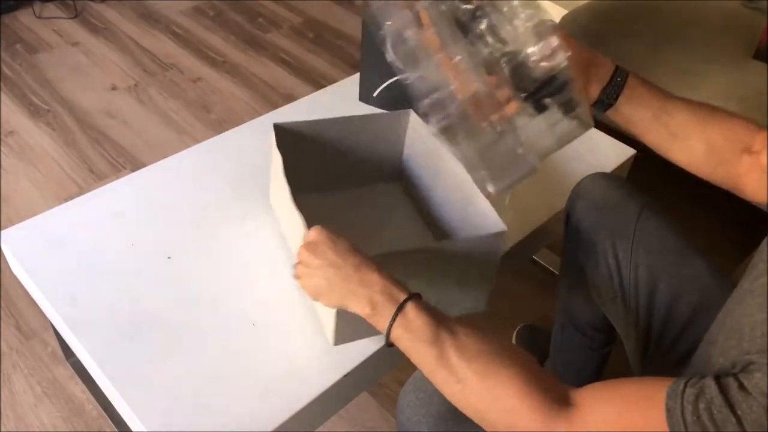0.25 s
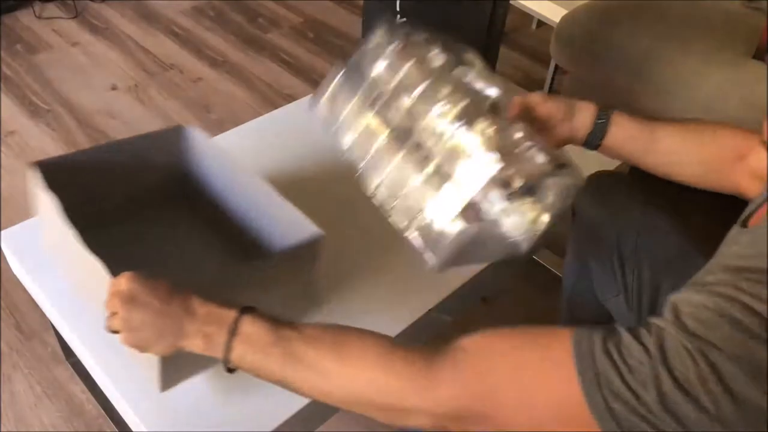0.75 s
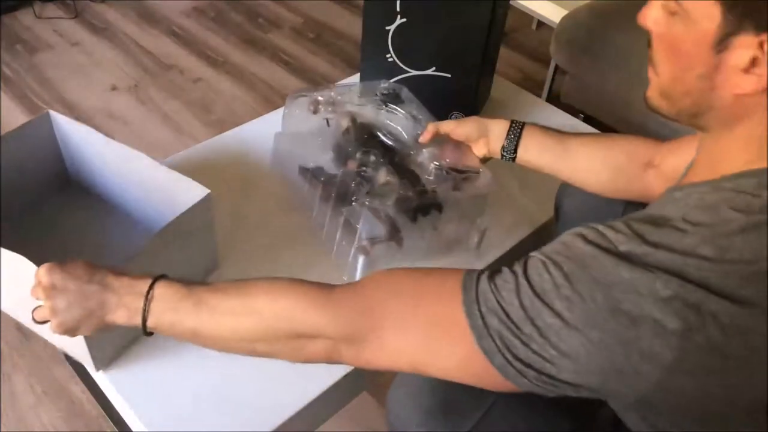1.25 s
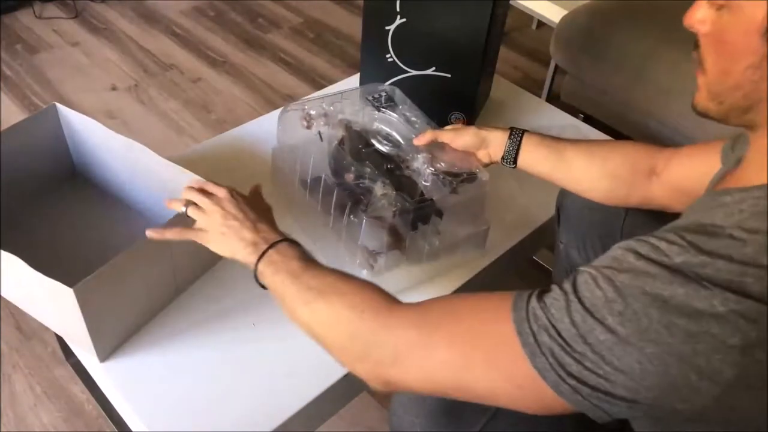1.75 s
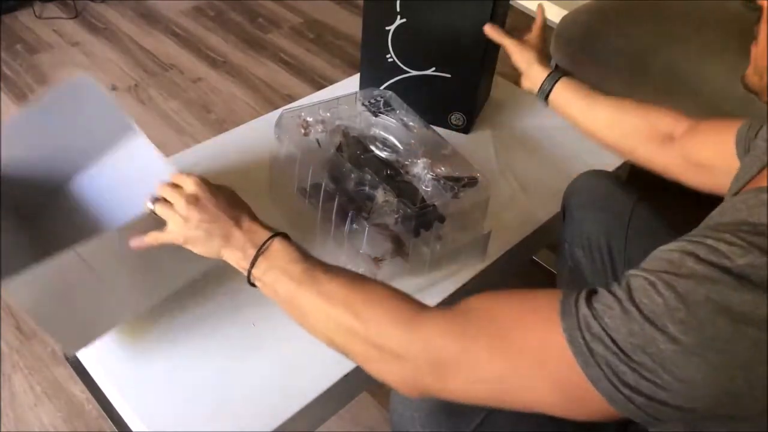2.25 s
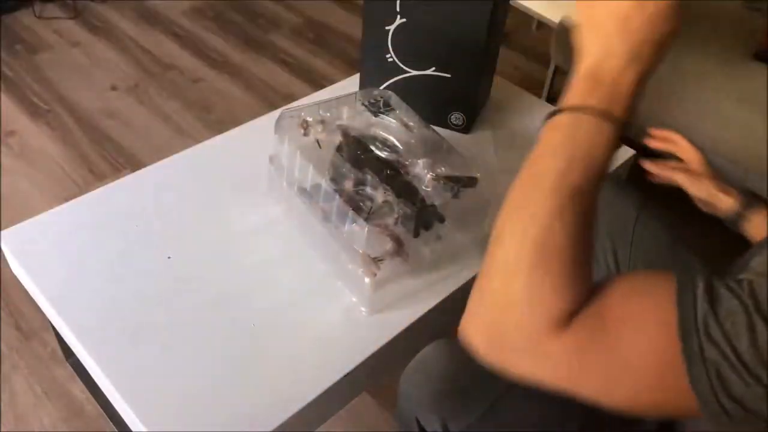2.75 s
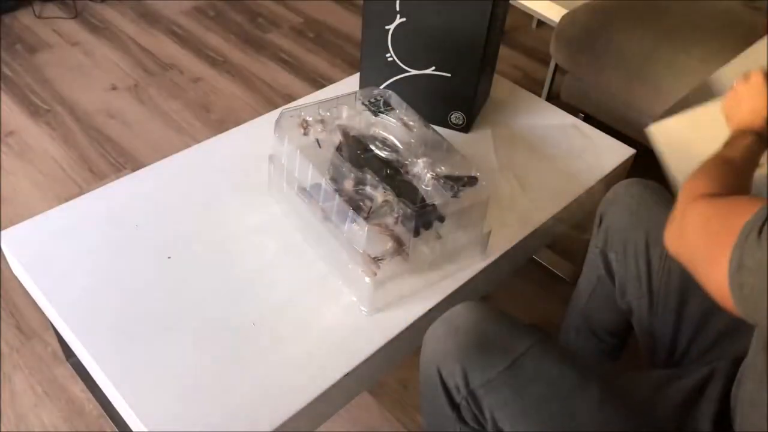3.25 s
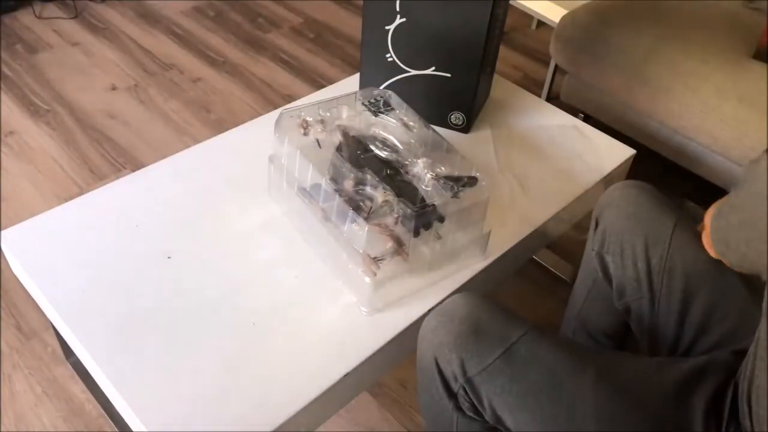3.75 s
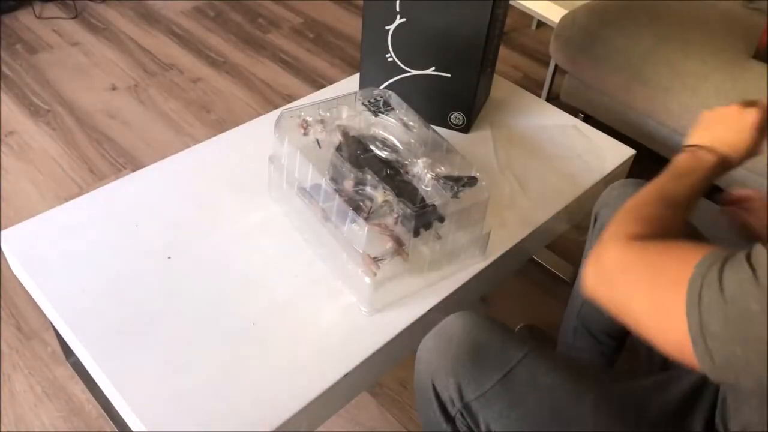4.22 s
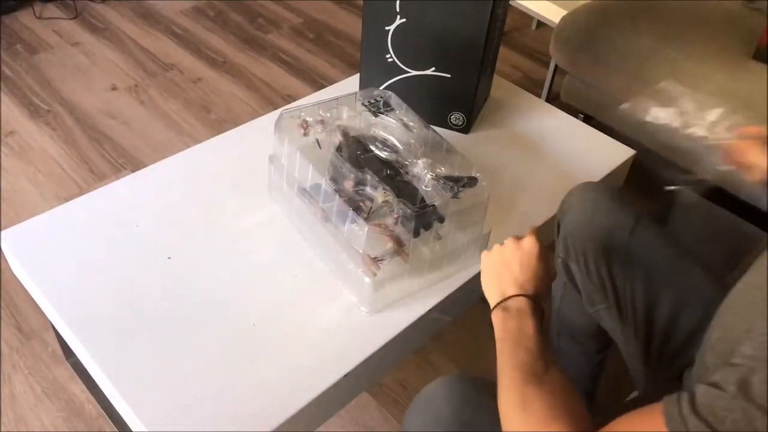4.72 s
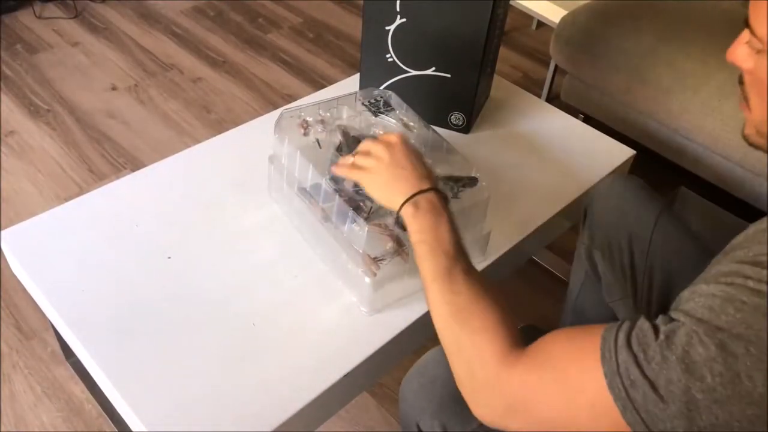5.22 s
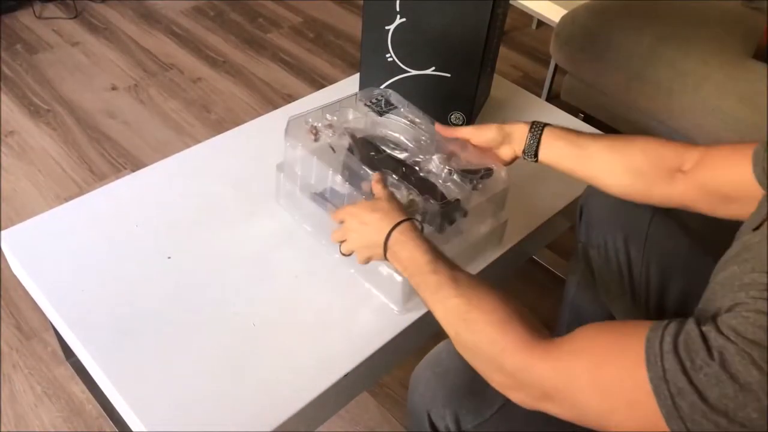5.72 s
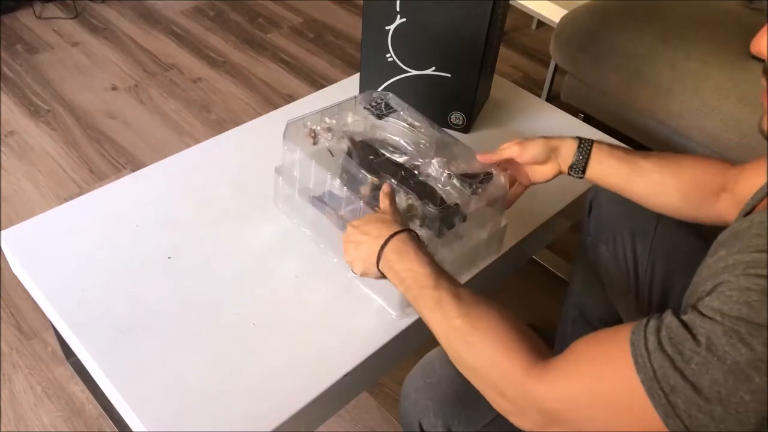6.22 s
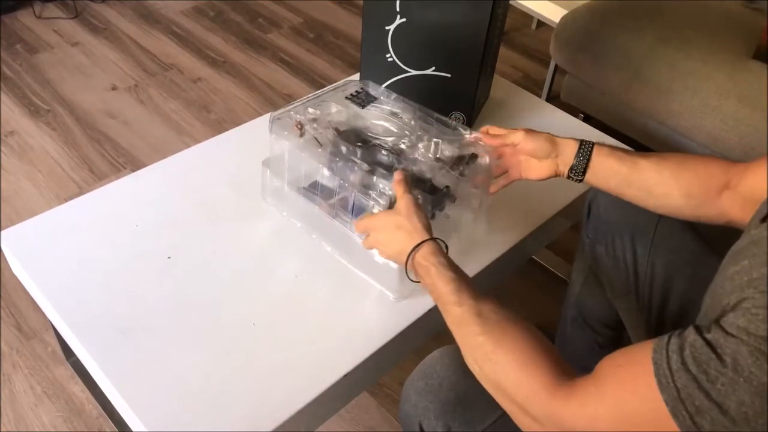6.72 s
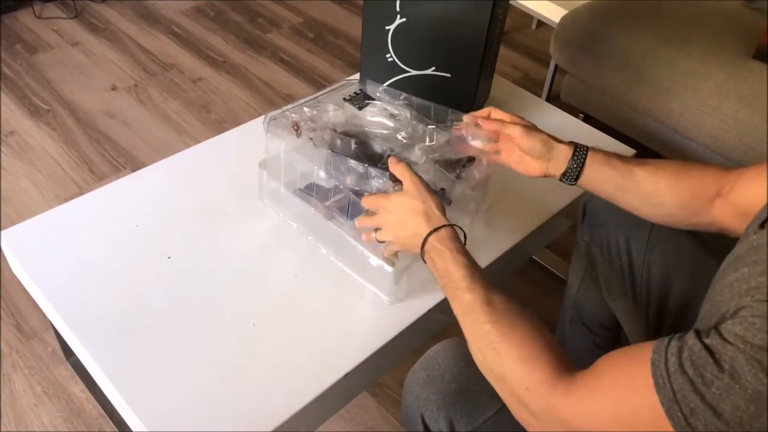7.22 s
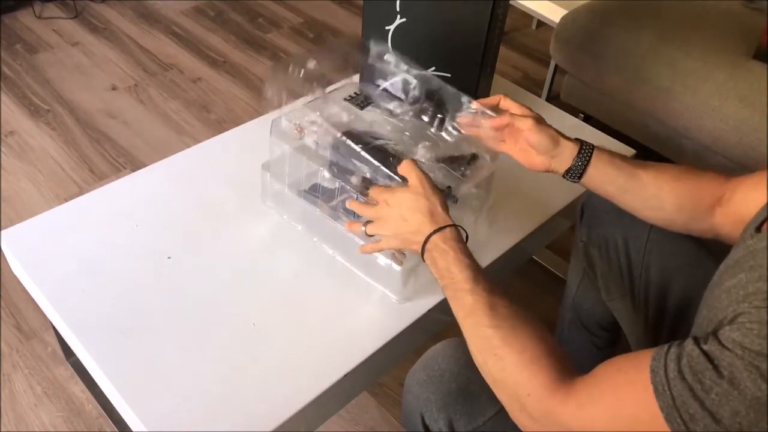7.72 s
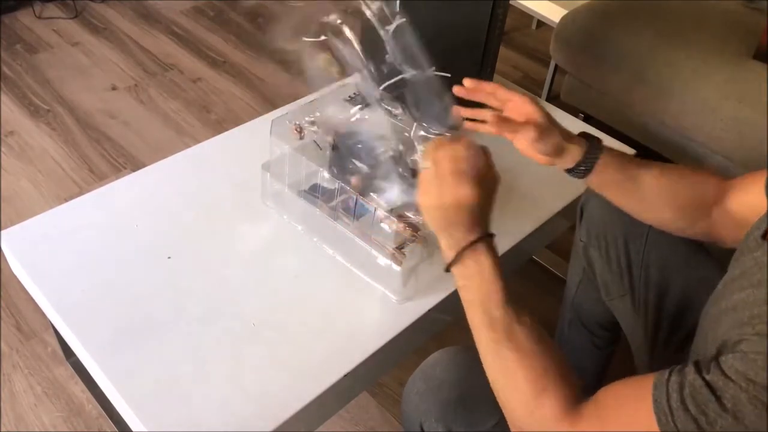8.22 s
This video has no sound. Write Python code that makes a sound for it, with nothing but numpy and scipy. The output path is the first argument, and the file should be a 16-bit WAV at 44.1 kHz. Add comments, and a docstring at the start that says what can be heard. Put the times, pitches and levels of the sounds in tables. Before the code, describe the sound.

Close indoor unboxing: an empty carton bumps a table and lands on the floor, a plastic bag crinkles, and a clear tray's lid pops open.

```python
"""Close microphone indoors: an earlier knock is still dying away, a cardboard box knocks and scrapes on a table,
then meets the floor. A plastic bag rustles, then a thin plastic tray is gripped and creaks, its lid's catches let
go and it snaps loudly near the end. Blows are bursts of noise ringing a body, hands are grainy noise, and short
dry clicks stand among them. A hard-floored room answers with a diffuse tail, over steady air and a faint hum."""
import sys
import numpy as np
from scipy import signal
from scipy.fft import rfft, irfft, next_fast_len
from scipy.io import wavfile
from scipy.ndimage import uniform_filter1d, map_coordinates

SR = 44100
rng = np.random.default_rng(int(sys.argv[2]) if len(sys.argv) > 2 else 0)


def inscribe(sig):
    """Save sig as 16-bit PCM at rate SR to the path in sys.argv[1].

    A 1-D sig is mono; a 2-D sig holds one channel per row.
    Samples are clipped to [-1, 1] before scaling.
    """
    pcm = np.round(np.clip(np.atleast_2d(sig).T, -1, 1) * 32767)
    wavfile.write(sys.argv[1], SR, pcm.astype(np.int16))


def gain_from_db(level_db):
    """Turn a decibel level (scalar or array-like) into a linear amplitude factor."""
    decades = np.asarray(level_db, float) / 20
    return 10 ** decades


N = 373527


def unit(x):
    """Scaled to rms 1."""
    return x / np.sqrt(np.mean(x ** 2) + 1e-20)


def along(points, hz):
    """Value at each frequency between (frequency, value) points, on a log axis."""
    f, v = np.transpose(points)
    return np.interp(np.log(hz + 1), np.log(f + 1), v)


def filtered(x, response):
    """x shaped by a complex response of frequency."""
    m = next_fast_len(N + SR // 2)
    return irfft(rfft(x, m) * response(np.fft.rfftfreq(m, 1 / SR)), m)[..., :N]


def body(modes, plain_db, dull_hz=1e6, edge_hz=1e6):
    """Causal sum of resonances over a plain path that fades above dull_hz and again above edge_hz."""
    def response(f):
        total = gain_from_db(plain_db) / (1 + 1j * f / dull_hz) / (1 + 1j * f / edge_hz)
        for centre, width, db in modes:
            total = total + gain_from_db(db) * 1j * f * width / (centre * centre - f * f + 1j * f * width)
        return total
    return response


def wobble(rate):
    """A smooth random curve, rate knots a second."""
    return map_coordinates(rng.standard_normal(int(N * rate / SR) + 4), [np.arange(N) * rate / SR])


def grainy(per_second, spread_db, noise_share):
    """Sparse slips of unequal size on a bed of noise."""
    size_db = spread_db * np.minimum(rng.exponential(size=N), 2.5)
    slips = (rng.random(N) < per_second / SR) * gain_from_db(size_db) * rng.choice([-1, 1], N)
    return unit(slips) + noise_share * rng.standard_normal(N)


def patchy(x, depth_db):
    """Folds give way in short, wide bursts; narrower patches of pitch stand out more weakly."""
    z = signal.stft(x, nperseg=256)[2]

    def smooth(hz_size, time_size):
        over_hz = uniform_filter1d(rng.standard_normal(z.shape), size=hz_size, axis=0)
        return unit(uniform_filter1d(over_hz, size=time_size, axis=1))

    field = smooth(hz_size=60, time_size=5) + .4 * smooth(hz_size=4, time_size=8)
    return unit(signal.istft(z * gain_from_db(depth_db * field), nperseg=256)[1][:N])


def blows(contacts, ringing, band_db):
    """Each contact is a swelling, dying chatter in four pitch ranges; returns near sound and what the walls get."""
    # limits of the bass, knock, click and tick ranges: (frequency [Hz])
    range_limits = [60, 400, 1500, 5000, 16500]
    tick_grows = 1.31  # the top range follows the bite more steeply than the click
    t = np.arange(SR // 8) / SR
    near, far = np.zeros((2, 4, N + len(t)))
    for s, knock_db, heft_db, bite_db, ms in contacts:
        # the treble of a contact ends first
        life = np.clip(ms, .2, 60) / 1000 * np.array([[1.8], [1.4], [.8], [.5]])
        tilt_db = np.array([heft_db, 0, bite_db, tick_grows * bite_db])
        gain = gain_from_db(knock_db + tilt_db + band_db)[:, None]
        swell = 1 - np.exp(-t / (0.089 * life))
        chatter = gain * rng.standard_normal((4, len(t))) * np.exp(-t / life) * swell
        at = max(round(s * SR), 0)
        near[:, at:at + len(t)] += chatter
        far[:, at:at + len(t)] += 0.41 * chatter
        # averaged over all directions, an even click
        far[:, at + SR // 300] += (gain * np.sqrt(life * SR / 2))[:, 0]
    out = np.zeros((2, N))
    centres = np.sqrt(np.multiply(range_limits[1:], range_limits[:-1]))
    for k, (lo, hi) in enumerate(zip(range_limits, range_limits[1:])):
        spread = np.sqrt(SR / 2 / (hi - lo))  # evens out the power of wide and narrow ranges
        band = signal.butter(2, [lo, hi], "band", fs=SR, output="sos")
        share = np.transpose([centres, np.eye(4)[k]])
        out[0] += spread * signal.sosfilt(band, near[k, :N])
        out[1] += spread * filtered(far[k, :N], lambda f: along(share, f))
    return filtered(out, ringing)


def box_on_table():
    """Contacts with the table ring the low, broad modes of a cardboard box."""
    # the box meets the table: (time [s], knock [dB], heft = bass over knock [dB],
    # bite = click over knock [dB], contact [ms])
    knocks = [(0.128, -10.5, -11.5, -6.5, 5.4), (0.209, -23.5, -7.5, -20, 6.4),
              (0.734, -52.5, 9, -6.5, 6.7), (1.173, -47.5, -1, -0.5, 6.8), (1.21, -46.5, -1.5, -8, 9.8),
              (1.459, -42.5, -2, -7.5, 9.5), (1.476, -33, -8, -7.5, 5.6), (1.812, -41, -21, 2, 8.5),
              (2.133, -50, 5.5, -8, 5.5), (2.156, -37, -26, -9, 4.3), (2.438, -48.5, 2, -44, 6),
              (2.456, -28.5, -7, -18.5, 4.7), (3.025, -54.5, -4, -1.5, 5.4), (3.194, -42.5, -13, -8.5, 6.6)]
    # resonances of the box: (frequency [Hz], width [Hz], level [dB])
    cardboard = [(134, 15, 11), (196, 26, 2), (272, 100, 6.5), (395, 190, -1.5), (686, 60, -10),
                 (990, 25, -6), (1200, 130, -18.5)]
    # band_db is (bass, knock, click, tick) for a blow without heft or bite, here and below
    return blows(knocks, body(cardboard, -8.0, dull_hz=3000, edge_hz=3600), band_db=(1, -0.5, 10.5, 16))


def box_on_floor():
    """Contacts with the floor ring deeper modes, with a weaker plain path."""
    # the box meets the floor: (time [s], knock [dB], heft [dB], bite [dB], contact [ms])
    landings = [(3.433, -31.5, -5.5, -26, 4.6), (3.507, -34.5, -6.5, -2, 5),
                (3.561, -32.5, -3.5, -12.5, 5.2), (3.822, -33, -2, -19, 6), (3.916, -18, -17, -25, 5.7),
                (4.111, -13, -22, -17.5, 7.2)]
    # resonances of the floor: (frequency [Hz], width [Hz], level [dB])
    floor = [(71, 19, 0.5), (150, 22, 2.5), (204, 60, 0.5), (299, 89, -5), (437, 173, -5),
             (713, 137, -12.5), (900, 90, -21)]
    return blows(landings, body(floor, -17.0, dull_hz=6190, edge_hz=36000), band_db=(3.1, -1.5, 11.5, 13.5))


def tray_snaps():
    """Snaps of thin plastic ring the shell of the tray."""
    # plastic snaps: (time [s], knock [dB], heft [dB], bite [dB], contact [ms])
    snaps = [(4.552, -49.5, -20, -11, 5.8), (4.632, -49, -18, 4, 5.4), (5.409, -53.5, -14, -9.5, 5.2),
             (5.478, -35, 0, -8, 6.1), (5.574, -39, 1, -1, 7.1), (5.797, -45, 5, 2, 5.8),
             (5.977, -37.5, -1, 2.5, 5), (6, -38, -14, -3.5, 6.8), (6.033, -33.5, -4, -2.5, 5.2),
             (6.108, -37.5, -6, -4, 6.2), (6.394, -47, -11, -24, 5.2), (6.646, -45, -21, -12.5, 3.6),
             (6.739, -45, 12, -14, 5.2), (6.861, -38.5, -4, -12.5, 4.5), (7.086, -35.5, -28, -4.5, 4.3),
             (7.89, -48, -19, -13, 4.8), (8.041, -49.5, -4, -10, 5.3), (8.167, -42.5, -11, -7.5, 6.7),
             (8.196, -42, -8, -8, 5.7), (8.316, -35, -9, -4, 16), (8.323, -23, -13.5, -6, 7.5),
             (8.335, -13.5, -18.5, -15.5, 10.3), (8.349, -11, -19, -28, 5.2), (8.454, -19.5, -17, -5.5, 6)]
    # resonances of the tray: (frequency [Hz], width [Hz], level [dB])
    plastic = [(231, 15, 5.5), (282.6, 27, 10.5), (400, 100, -43), (562, 65, -1), (1000, 340, -14.5),
               (1370, 270, -18.5), (1814, 48, -23.5), (3150, 390, -14)]
    return blows(snaps, body(plastic, -9.0, dull_hz=11100, edge_hz=16000), band_db=(-0.5, 0.5, 7, 11.5))


def lid_catches():
    """The catches let go and ring the lid, whose modes reach far into the treble."""
    # the lid's catches let go: (time [s], knock [dB], heft [dB], bite [dB], contact [ms])
    releases = [(7.369, -22, -20, -3, 2.7), (7.414, -18, -12.5, 2, 5)]
    # resonances of the lid: (frequency [Hz], width [Hz], level [dB])
    lid_modes = [(273, 44, 7), (977, 88, -2), (1440, 170, 2.5), (1790, 120, 2), (3720, 690, -4.5),
                 (4770, 460, -3), (5920, 700, -5.5), (7660, 1600, -3)]
    return blows(releases, body(lid_modes, -4.5, dull_hz=12000, edge_hz=20000), band_db=(2.5, -0.5, 5.5, 4))


def handling():
    """Pressure drums on the table, slip rustles thin plastic, both scrape the walls; the table hums under dragging."""
    # an earlier knock is still dying away: (time [s], pressure [dB], slip [dB])
    dying_knock = [(0.0, -33, -40), (0.11, -49, -61.5)]
    # hands at work, one table a stroke: (time [s], pressure [dB], slip [dB])
    on_box = [(0.72, -67.5, -70.5), (0.79, -84, -58), (0.9, -63, -66), (1.23, -62.5, -62.5),
              (1.41, -54, -55), (1.57, -65.5, -71.5), (1.79, -55, -68.5), (1.85, -52.5, -65.5),
              (1.98, -58, -56), (2.08, -52, -57.5), (2.18, -69, -63.5), (2.31, -60, -65.5),
              (2.47, -67.5, -95), (2.65, -63, -80), (2.74, -67, -95), (2.97, -66.5, -83),
              (3.11, -64, -80.5), (3.4, -73, -78)]
    on_floor = [(3.95, -40, -59), (4.056, -63, -59), (4.17, -38.5, -54.5), (4.3, -64, -65.5)]
    on_bag = [(4.5, -74, -77.5), (4.64, -60, -63), (4.792, -67, -58.5), (5.058, -65, -62),
              (5.12, -75.5, -56), (5.272, -75, -70), (5.42, -69, -101)]
    on_tray = [(5.5, -70, -63), (5.54, -71, -64), (5.638, -56, -53.5), (5.694, -59.5, -50.5),
               (5.87, -50.5, -59), (6.02, -62, -85), (6.092, -40, -56), (6.246, -53.5, -77.5),
               (6.484, -56.5, -57.5), (6.628, -50, -54), (6.726, -55, -59), (6.972, -49, -69),
               (7.288, -42, -55.5), (7.35, -85, -61)]
    on_lid = [(7.75, -73.5, -70), (7.934, -70, -79), (8.056, -55, -83), (8.152, -68.5, -76.5),
              (8.3, -65, -69)]
    # short low hums of the table under dragging: (middle [s], length [s], level before the grip [dB])
    drags = [(1.034, 0.092, -63), (1.312, 0.11, -47.5), (1.91, 0.091, -54.5), (2.2, 0.28, -63),
             (2.405, .1, -66), (6.103, 0.11, -57.5), (7.28, 0.21, -72.5)]
    # resonances of the table: (frequency [Hz], width [Hz], level [dB])
    table_modes = [(208, 120, -2.5), (272, 146, -0.5), (406, 270, -9.5)]
    # spectra of scraping and rustling: (frequency [Hz], relative level [dB])
    scrape_tone = [(250, -20), (500, -1), (1000, -1.5), (2000, -5.5), (3300, -5.5), (6000, -61.5),
                   (10000, -54)]
    rustle_tone = [(1200, -70), (2500, -13), (5000, -6), (8000, -9.5), (12000, -20), (16000, -18)]
    # each material: (drumming over pressure, scraping over the blend, rustling over slip), dB
    card, film, shell = (-3, -1.2, -1), (-5, -0.74, -0.77), (-5, -2.5, -5.5)
    pressure_share = 0.51  # of pressure in scraping, the rest is slip
    strokes = [(dying_knock, card), (on_box, card), (on_floor, card),
               (on_bag, film), (on_tray, shell), (on_lid, shell)]

    t, gains = np.arange(N) / SR, np.zeros((4, N))
    for stroke, material_db in strokes:
        s, pressure_db, slip_db = np.transpose(stroke)
        fade = np.clip(np.minimum(t - s[0], s[-1] - t) / .03 + 1, 0, 1)  # 30 ms outside the stroke
        blend_db = pressure_share * pressure_db + (1 - pressure_share) * slip_db
        curves = zip([pressure_db, blend_db, slip_db], material_db)
        gains[:3] += fade * gain_from_db([np.interp(t, s, curve + db) for curve, db in curves])
    gains[3] = sum(gain_from_db(db) * np.exp(-(2 * (t - s) / length) ** 2) for s, length, db in drags)

    grip = gain_from_db(1.5 * wobble(25))  # an uneven grip shakes the layers together
    drum = unit(filtered(grainy(120, 7, 0.8), lambda f: body(table_modes, -60)(f) ** 2))
    scrape = patchy(filtered(grainy(300, 1.25, 0.93), lambda f: gain_from_db(along(scrape_tone, f))), depth_db=6.0)
    rustle = patchy(filtered(grainy(200, 5.1, 0.97), lambda f: gain_from_db(along(rustle_tone, f))), depth_db=3.5)
    table_hum = unit(filtered(grainy(100, 3, 0.21), lambda f: body([(115, 22, 0)], -60)(f) ** 2))
    return grip * np.sum(gains * [drum, scrape, rustle, table_hum], axis=0)


def ping():
    """A small hard part is scuffed once: a short rough scrape rings a few hard resonances."""
    # the scuff: (time [s], level before its rise and fall [dB])
    scuffs = [(2.217, -25.5)]
    # resonances of the part: (frequency [Hz], width [Hz], level [dB])
    hard_modes = [(1050, 250, -5), (1600, 200, -4), (2095, 80, 3), (2350, 500, -4), (3150, 250, -5)]
    rise_s, fall_s = 0.013, 0.02
    t, push = np.arange(N) / SR, np.zeros(N)
    for s, db in scuffs:
        since = np.maximum(t - s, 0)
        push += gain_from_db(db) * (1 - np.exp(-since / rise_s)) * np.exp(-since / fall_s)
    return filtered(push * grainy(900, 3, 1.0), body(hard_modes, -35))


def crackles():
    """Dry clicks of under a millisecond with a short fizz, like creases popping in thin plastic."""
    # short dry treble clicks: (time [s], treble peak [dB])
    clicks = [(0.8418, -46), (0.949, -40), (1.0434, -37.5), (1.0949, -42), (1.4955, -30.5), (2.0293, -33.5),
              (2.0547, -24), (4.4329, -52.5), (4.645, -36.5), (4.7136, -43.5), (4.8148, -42), (4.8703, -41),
              (4.9013, -45), (4.9157, -34.5), (5.0794, -35.5), (5.0976, -40), (6.0125, -27), (6.0484, -26),
              (6.1268, -27), (6.5929, -41), (6.7009, -40.5), (6.7126, -31), (6.7239, -31), (6.8334, -40),
              (6.9526, -38), (6.9667, -46.5), (6.986, -24.5), (7.002, -35), (7.0082, -29.5), (7.1621, -22),
              (7.1771, -27.5), (7.1935, -25.5), (7.206, -31), (7.2222, -30), (7.9109, -52)]
    pop_db = 4.5  # first swing of a click over its treble peak
    out, t = np.zeros(N + SR), np.arange(SR // 50) / SR
    for s, db in clicks:
        click = np.cos(2 * np.pi * rng.uniform(1600, 3300) * t) * np.exp(-t / 0.00013)
        fizz = 0.37 * rng.standard_normal(len(t)) * np.exp(-t / 0.0017)
        out[round((s + .0008) * SR):][:len(t)] += gain_from_db(db + pop_db) * (click + fizz)
    thin = signal.sosfilt(signal.butter(2, 900, "high", fs=SR, output="sos"), out[:N])
    return filtered(thin, body([], 0, dull_hz=8350))


def room(x):
    """Diffuse tail that swells as the walls join in; sources move, so each fifth of a second has its own tail."""
    # reverberation of the room: (frequency [Hz], time to fall by 60 dB [s])
    decay_times = [(80, 0.56), (210, 0.48), (560, 0.51), (1500, 0.65), (3900, 0.53), (10000, 0.38),
                   (16000, 0.13)]
    out, step, size = np.zeros(N + 2 * SR), SR // 5, 3 * SR // 4
    for at in range(0, N, step):
        hz, t, z = signal.stft(rng.standard_normal(size), SR, nperseg=256)
        decay = gain_from_db(-60 * t / along(decay_times, hz)[:, None])
        tail = signal.istft(z * decay, SR, nperseg=256)[1][:size]
        tail = tail * (1 - np.exp(-(np.arange(size) / SR / 0.0019) ** 2))
        wet = signal.fftconvolve(x[at:at + step], tail / np.linalg.norm(tail))
        out[at:at + len(wet)] += wet
    return out[:N]


def hush():
    """Steady air and distant rumble as shaped noise, and a wavering appliance hum."""
    # spectrum of air and rumble: (frequency [Hz], relative level [dB])
    air_tone = [(15, -47.5), (25, 3), (59, 15), (130, -2), (180, 1.5), (223, -24), (489, -1.5), (641, -9),
                (1160, -31.5), (3520, -7), (4030, -16.5), (7310, -13.5), (11500, -21.5), (16000, -24)]
    # appliance hum: (frequency [Hz], level [dB])
    hum_tones = [(184, -75)]
    air = unit(filtered(rng.standard_normal(N), lambda f: gain_from_db(along(air_tone, f))))
    hum = np.zeros(N)
    for hz, db in hum_tones:
        level = gain_from_db(db + 1.2 * wobble(6)) * np.sqrt(2)
        hum += level * np.sin(2 * np.pi * hz * np.arange(N) / SR + 0.72 * wobble(5))
    return gain_from_db(-66.5 + 0.95 * wobble(12.0)) * air + hum


def scene():
    """Near sounds, their share through the room, and the quiet house."""
    box, drops, tray, lid = box_on_table(), box_on_floor(), tray_snaps(), lid_catches()
    hands, pops = handling() + ping(), crackles()
    to_walls = gain_from_db(-4.0) * box[1] + gain_from_db(2.5) * drops[1] + gain_from_db(-2.5) * tray[1] + gain_from_db(-4.0) * lid[1]
    to_walls += gain_from_db(-2.5) * hands + gain_from_db(-6.5) * pops
    near = box[0] + drops[0] + tray[0] + lid[0] + hands + pops
    return (near + room(to_walls) + hush())[None]


def roll_off(x):
    """The treble ends steeply here."""
    return signal.sosfilt(signal.butter(12, 16830, fs=SR, output="sos"), x)


def record(dry):
    """The camera's microphone rounds off the loudest peaks and loses the deep bass and all above its band limit."""
    top_hz, bass_hz = 15900, 45
    soft = dry[0] / (1 + np.abs(dry[0] / .6) ** 3) ** (1 / 3)
    mix = filtered(soft, lambda f: (f < top_hz) * (1j * f / (1j * f + bass_hz)) ** 2)[None]
    return roll_off(mix)


dry = scene()
out = record(dry)
inscribe(out)
```